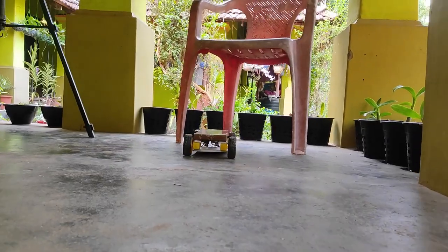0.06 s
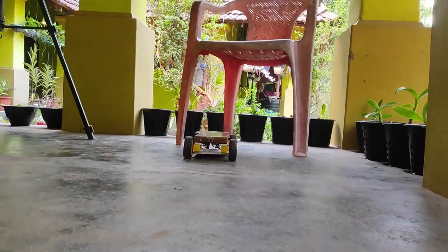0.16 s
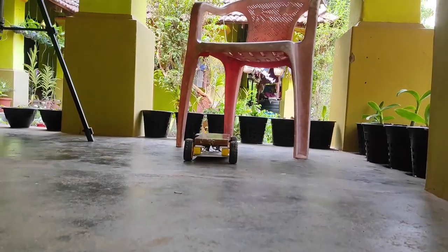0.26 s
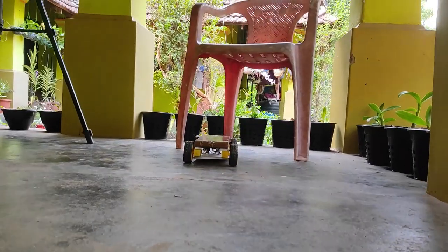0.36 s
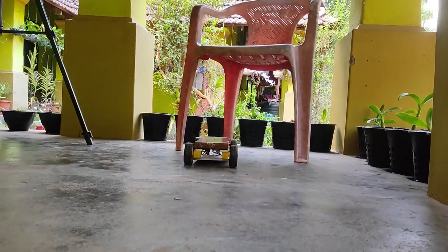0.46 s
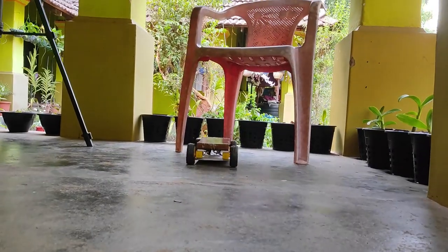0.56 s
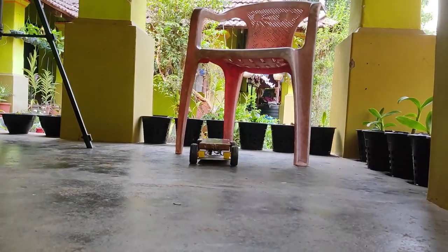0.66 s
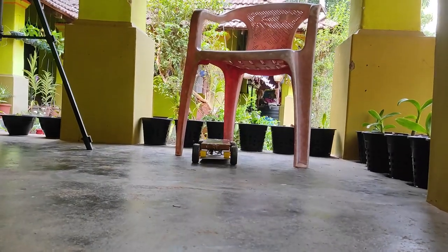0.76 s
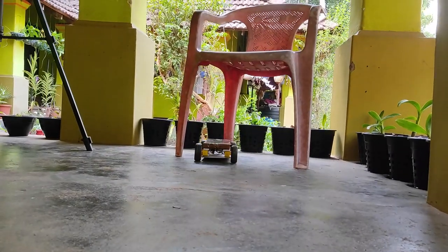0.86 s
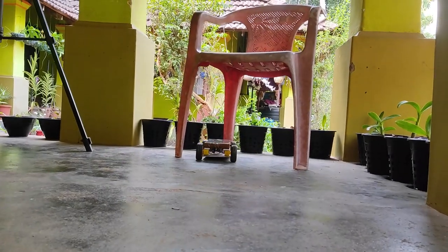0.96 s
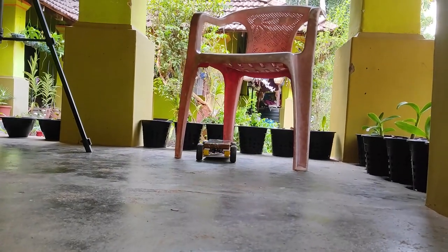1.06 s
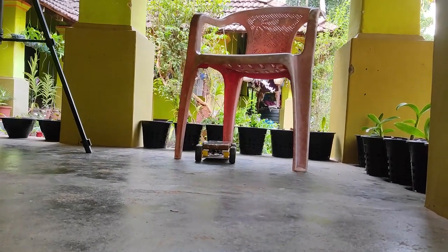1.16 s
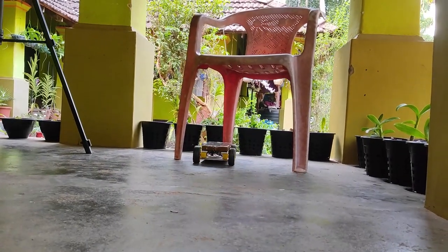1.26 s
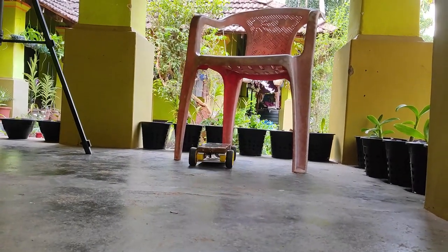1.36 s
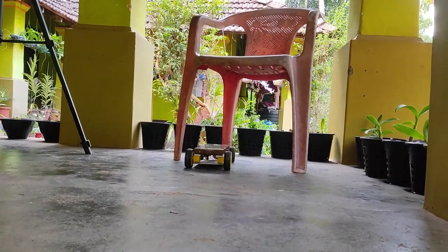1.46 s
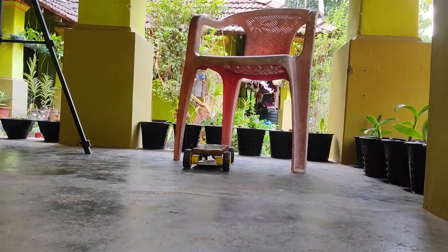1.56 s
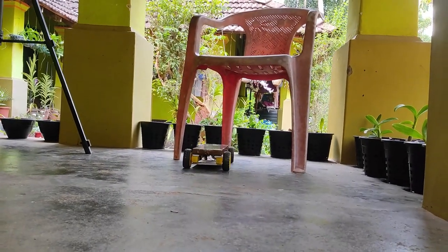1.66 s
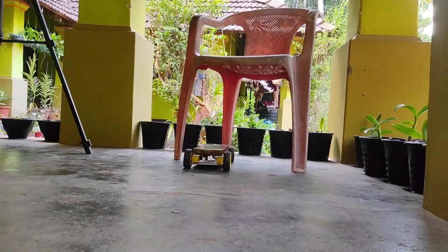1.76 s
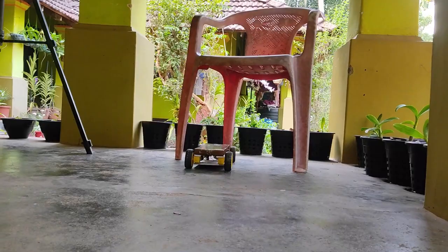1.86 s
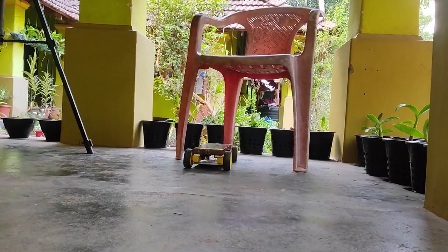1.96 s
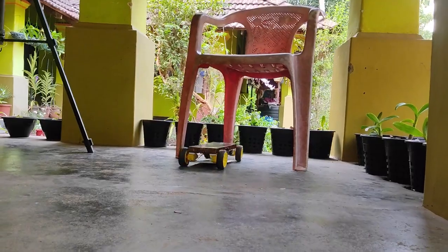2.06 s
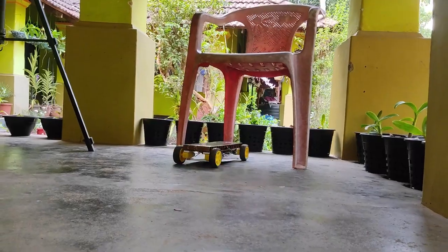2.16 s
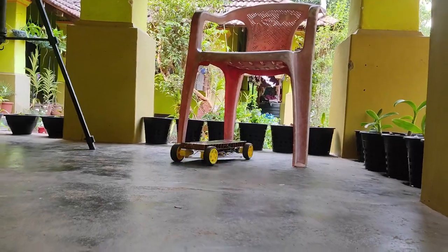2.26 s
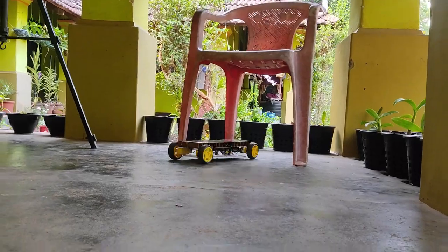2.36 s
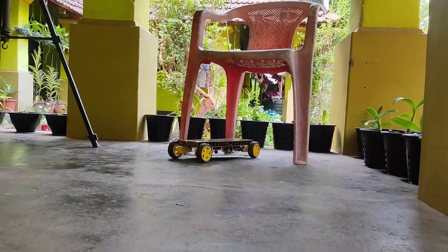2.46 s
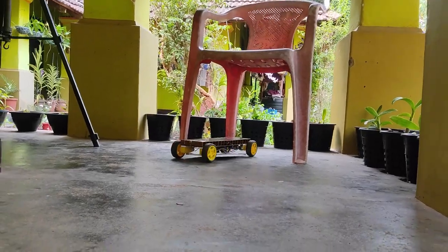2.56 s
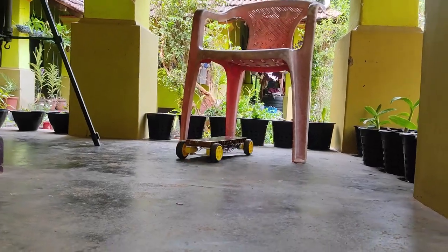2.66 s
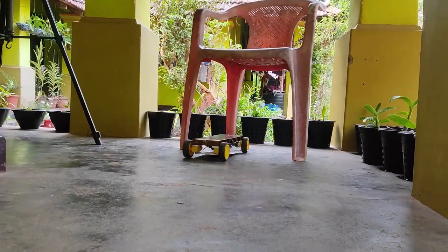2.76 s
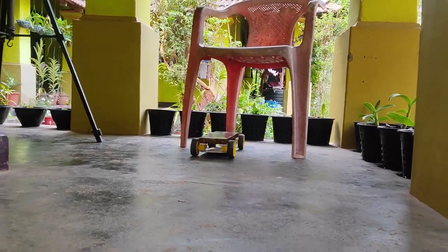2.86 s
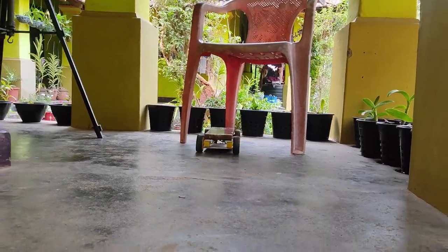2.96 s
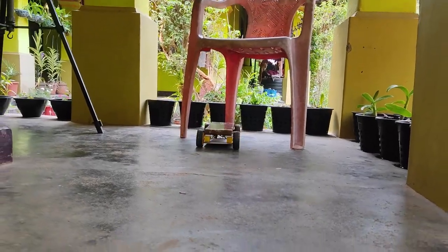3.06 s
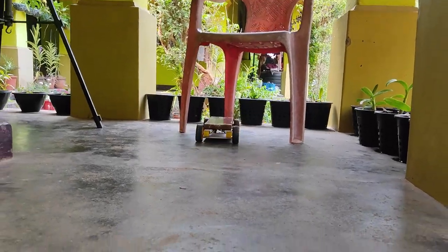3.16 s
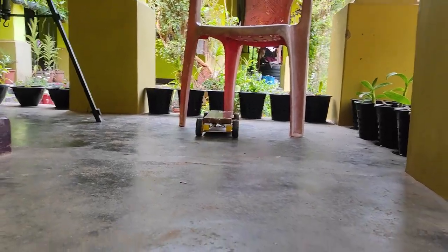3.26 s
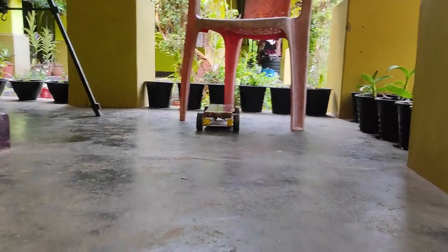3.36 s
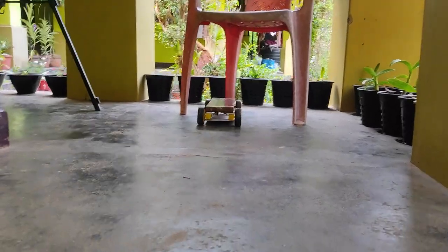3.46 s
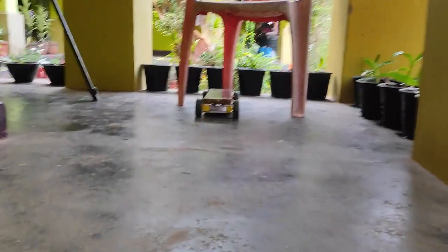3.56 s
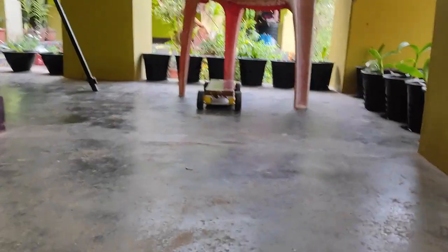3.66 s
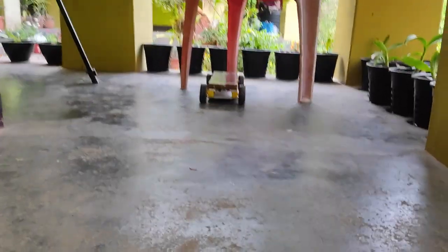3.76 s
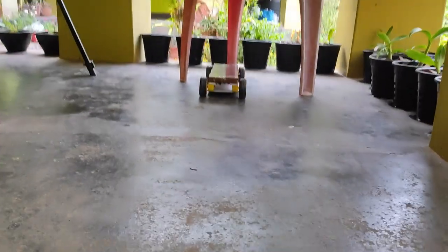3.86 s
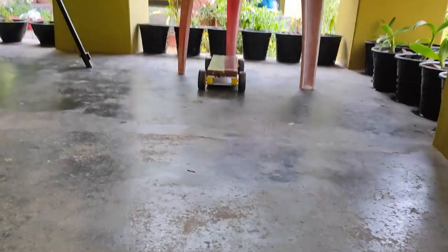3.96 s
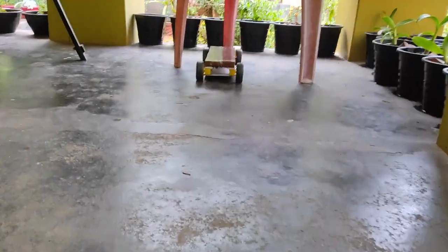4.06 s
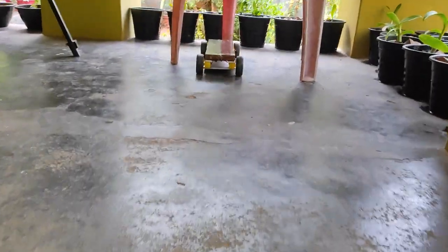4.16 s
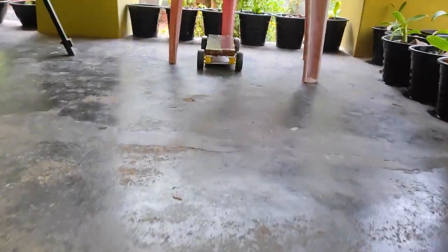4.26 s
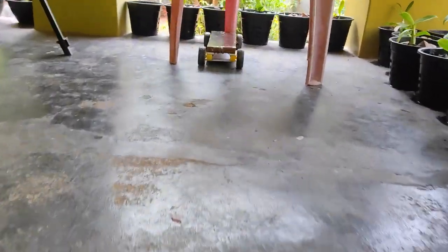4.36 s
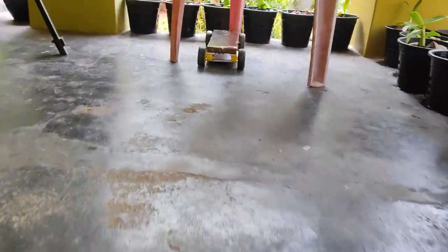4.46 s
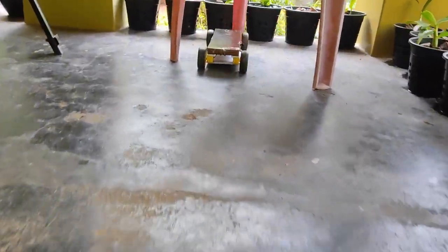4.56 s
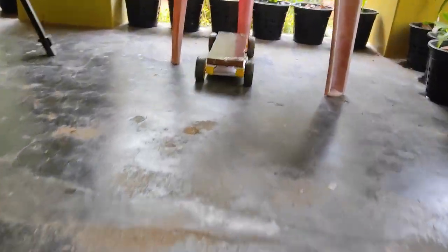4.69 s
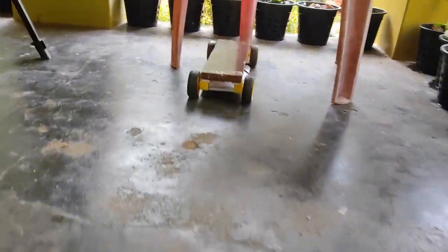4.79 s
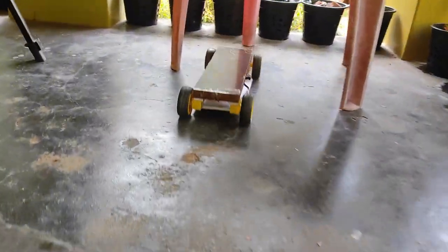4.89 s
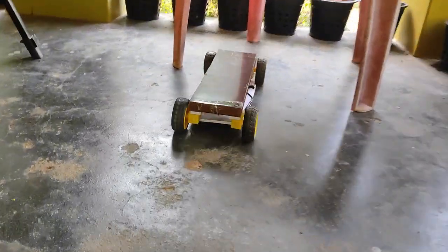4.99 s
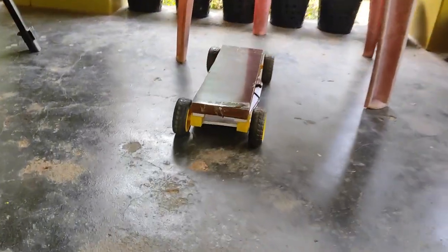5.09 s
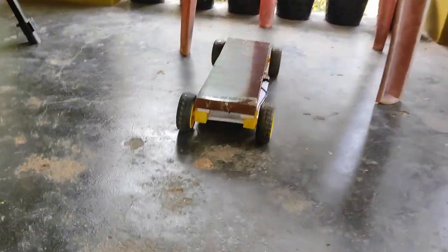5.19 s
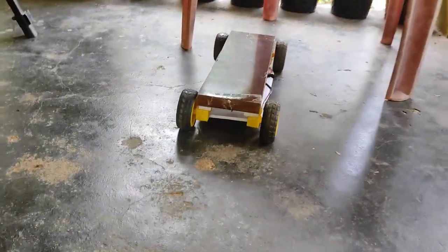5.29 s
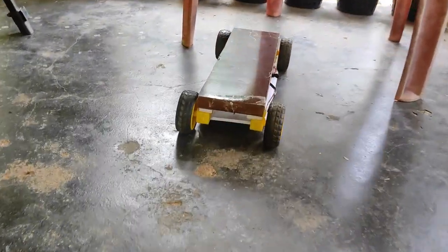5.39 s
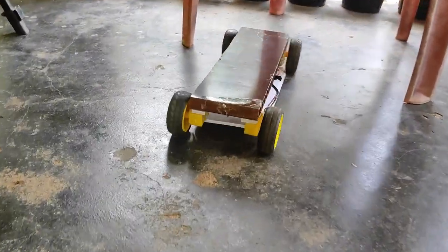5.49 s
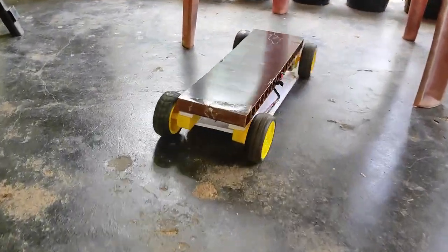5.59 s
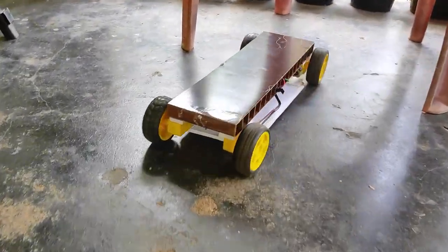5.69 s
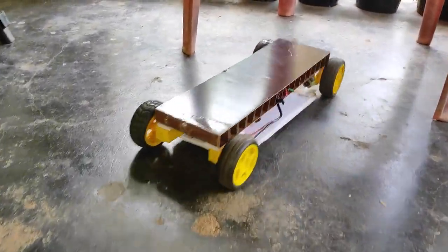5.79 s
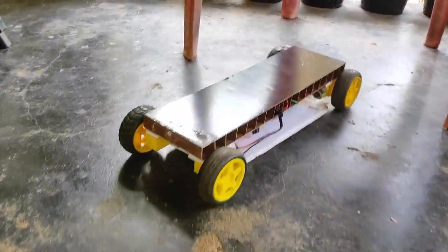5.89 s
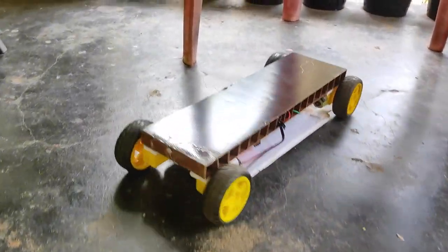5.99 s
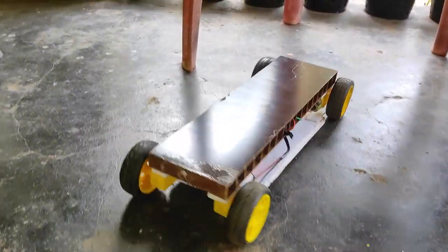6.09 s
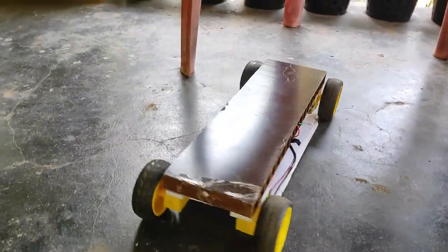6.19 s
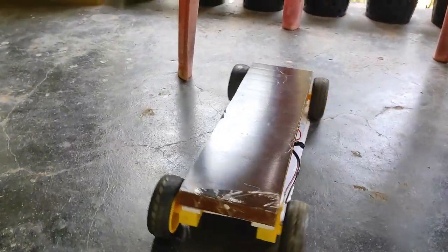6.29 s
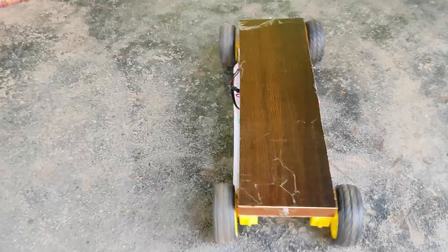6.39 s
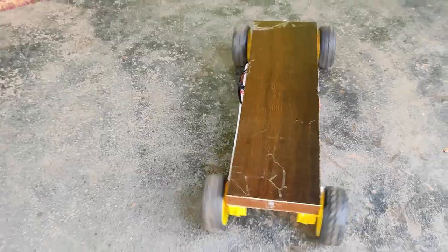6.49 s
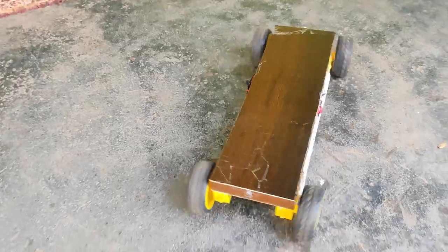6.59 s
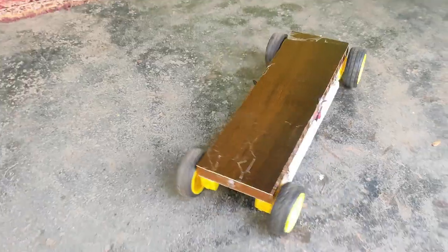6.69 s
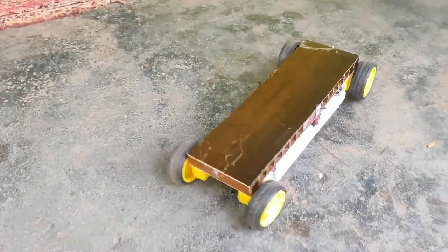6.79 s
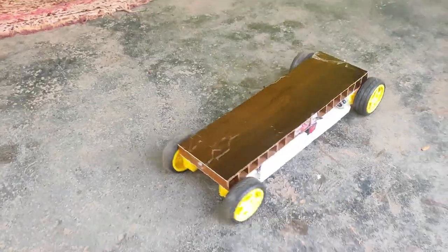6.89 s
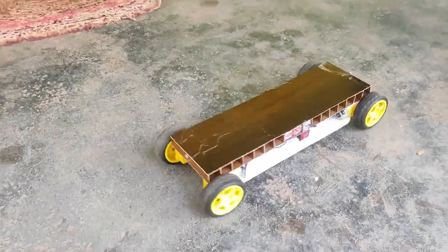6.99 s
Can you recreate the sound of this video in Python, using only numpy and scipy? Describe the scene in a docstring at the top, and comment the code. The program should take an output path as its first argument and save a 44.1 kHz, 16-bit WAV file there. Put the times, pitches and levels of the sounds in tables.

```python
"""A small robot car with four plastic gear motors drives back and forth in bursts on a concrete veranda.
Each gearbox whines at multiples of its tooth-mesh rate and rattles as the loose teeth knock; tyres rumble.
Soft rustles fall in the pauses, and a hand bumps the microphone, whose case rings in its modes.
After a short gap the car runs on rougher ground. Far birds, an insect and a low rumble and hum
sound faintly from the garden."""
import sys
import numpy as np
from scipy import signal
from scipy.fft import rfft, irfft
from scipy.io import wavfile

SR = 44100
rng = np.random.default_rng(int(sys.argv[2]) if len(sys.argv) > 2 else 0)


def log_audio(samples):
    """Write samples as a 16-bit WAV file to the path given in sys.argv[1]."""
    # one column per channel
    frames = np.atleast_2d(samples).T
    # limit to full scale, then quantise
    limited = np.clip(frames, -1, 1)
    pcm = np.round(limited * 32767).astype(np.int16)
    wavfile.write(sys.argv[1], SR, pcm)


N = 310464
TIME = np.arange(N) / SR
BINS = np.maximum(np.arange(N // 2 + 1) * SR / N, 1)

# noise spectra: f/Hz, relative spectral density/dB
GARDEN_SPECTRUM = [(12, -21), (20, 1), (55, -2), (75, -8.5), (140, -14.5), (211, -14.5), (522, -20),
                   (1160, -24), (1610, -28.5), (1790, -31), (2700, -31), (3760, -34), (5220, -40),
                   (7870, -38.5), (8550, -49.5), (14000, -43)]
VERANDA_HOUSING = [(100, -15), (300, -26), (700, -10), (1150, -7), (1480, 8), (1750, 1), (2200, -0.5),
                   (2900, 3.5), (3500, 3), (4300, 0), (5200, -2.5), (6500, -7), (7300, -9), (8500, -14)]   # radiated by gearboxes and chassis
ROUGH_HOUSING = [(100, -20), (400, -17.5), (900, -8), (1350, 5), (1520, -2), (1720, 15), (1920, 4.5),
                 (2150, -0.5), (3000, -1.5), (3900, 3.5), (4800, -5.5), (5800, -4.5), (6500, -3),
                 (7600, -17)]
FIZZ_SPECTRUM = [(5500, -7), (7800, 4), (9100, -3), (10200, 2), (12000, 2.5), (14400, -5)]
TYRE_SPECTRUM = [(60, -12), (130, -11), (200, 0), (280, -8), (450, 2), (650, -3.5), (900, 4.5), (1500, -28),
                 (4000, -50)]
RUSTLE_SPECTRUM = [(500, -10), (3500, 0), (7000, -2), (14000, -6)]
KNOCK_SPECTRUM = [(35, -26), (90, -9), (150, 0), (230, 2), (350, 1.5), (700, 3), (1100, -4.5), (2000, -5.5),
                  (3500, -14), (8000, -37)]
# likeness of the two sides: f/Hz, correlation
GARDEN_COHERENCE = [(30, 0.33), (200, 0.74), (600, 0.57), (1500, 0), (8000, 0.048)]
NEAR_COHERENCE = [(300, 1), (1400, 0.36), (2800, 0.44), (4500, 0.2), (8000, -0.33), (13000, 0.0026)]
# stereo image of the car: f/Hz, left minus right/dB
VERANDA_BALANCE = [(1000, 0), (1450, 0.5), (2200, -1.5), (3000, -4.5), (4300, -7.5), (5700, -2.5),
                   (7200, -10.5), (9000, -1), (11000, -7), (13500, -9)]
ROUGH_BALANCE = [(900, 1.5), (1330, -13.5), (1650, 1), (2000, -11.5), (3000, -3.5), (4000, -0.5),
                 (5000, -6), (6600, -14.5), (8000, 5), (13000, -1)]
# far bird notes: t/s, length/s, start f/Hz, end f/Hz, level/dB, rasp as a share of the pitch
BIRD_NOTES = [(0, .16, 1170, 1296, -63.5, 0.021), (.07, 0.27, 1295, 1360, -68, .015),
              (0, .16, 3450, 3700, -70, 0.044), (.22, 0.18, 780, 950, -65.5, 0.064),
              (.34, 0.13, 3150, 3140, -66, .03), (.41, 0.084, 2120, 2200, -66, 0.07),
              (3.42, 0.11, 3750, 3660, -63, 0.046), (3.42, 0.2, 2710, 2610, -68.5, 0.045),
              (3.442, .14, 1580, 1540, -69, 0.046), (3.3, .5, 828, 810, -69.5, 0.045),
              (5.34, 0.12, 3605, 3590, -61, 0.039), (5.345, 0.11, 2810, 2720, -64, 0.1)]
# the insect's tone: t/s, f/Hz, level/dB
INSECT_TONE = [(0, 8200, -98), (1.8, 7900, -82), (3.9, 7830, -67), (5.3, 7600, -66)]
# bursts of driving: power on t/s, up to speed t/s, power off t/s, 3rd harmonic/dB, 5th harmonic/dB,
# swell of the 3rd/(dB/s), scrub (how far unequal wheel loads part the motors' speeds),
# rattle/dB, fizz/dB, tyres/dB, run-down of rattle and fizz/(dB/s)
FORWARD_RUNS = [(.472, .605, .985, -35.5, -41.5, -16, .7, -40.3, -42, -68, 330),
                (1.972, 2.08, 2.485, -39.5, -46.5, 14, 1.7, -39.6, -44.6, -63.5, 450),
                (3.97, 4.115, 4.485, -35.8, -43.2, 1, .8, -41.5, -47.2, -65, 400),
                (5.468, 5.578, 5.97, -27.3, -47, 5, 1.6, -35.8, -42, -62, 450)]
REVERSE_RUNS = [(1.01, 1.066, 1.503, -41.8, -42, 5, 1.2, -42.8, -45.4, -64.5, 150),
                (2.5, 2.548, 2.985, -39.3, -40, -3, 1.2, -42.3, -47.6, -59.5, 230),
                (4.52, 4.571, 4.995, -38, -37.3, 0, 1.1, -40.8, -46.2, -63.5, 135),
                (5.965, 6.122, 6.43, -33.3, -34, -24, .9, -36, -41.3, -52, 200)]
ROUGH_RUN = (6.43, 6.66, 7.04, -33, -45, -4, .86, -38.2, -48, -68, 200)
DRAGGING_RUN = (5.47, 5.575, 5.97, -39.5, -55, -38, 1.2)   # one wheel drags in a turn; first seven columns only
# the mesh fundamental, one curve a run: t/s, f/Hz, level/dB
FORWARD_MESH = [
    [(.61, 1478, -36.5), (.8, 1489, -35), (.96, 1488, -50)],
    [(2.09, 1416, -43), (2.24, 1406, -40), (2.38, 1443, -50), (2.47, 1420, -46)],
    [(4.11, 1478, -42), (4.32, 1486, -41), (4.49, 1452, -44)],
    [(5.58, 1455, -46.5), (5.74, 1378, -49), (5.83, 1410, -51)],
]
REVERSE_MESH = [
    [(1.07, 1402, -28.5), (1.22, 1405, -31.5), (1.39, 1468, -26), (1.5, 1455, -28)],
    [(2.56, 1385, -37.5), (2.69, 1419, -35.5), (2.83, 1399, -29), (2.97, 1430, -28)],
    [(4.57, 1450, -28.5), (4.64, 1436, -28), (4.85, 1486, -27), (4.98, 1495, -27)],
    [(6.12, 1488, -25), (6.27, 1415, -27.3), (6.42, 1416, -26.5)],
]
ROUGH_MESH = [(6.5, 1327, -31), (6.76, 1327, -29.5), (6.92, 1355, -29), (7.04, 1334, -32.5)]
DRAGGING_MESH = [(5.57, 1252, -57), (5.76, 1190, -55)]
# further mesh harmonics: harmonic number, level against the 5th/dB
FORWARD_OVERTONES = [(2, 1), (4, -4.5), (6, -20.5), (7, -9.5), (8, -6)]
REVERSE_OVERTONES = [(2, -6), (4, -6.5), (6, -15), (7, -15.5), (8, -17), (9, -15)]
ROUGH_OVERTONES = [(2, -7), (4, -8.5)]
# the four motors: speed offset per unit of scrub/%, relative level/dB, lag of the right side/ms
MOTORS = [(0, 4.5, 0.095), (-1.14, -3, -0.042), (0.87, -6, 0.14), (-3, -10.5, 0.068)]
# dips of the whine: t/s, half width/s, depth/dB
LOAD_DIPS = [(2.33, .03, 15), (4.715, .028, 8), (6.603, .012, 6), (6.795, .02, 17)]
# faint rustles: peak t/s, level/dB, time to fall 60 dB/s
RUSTLES = [(1.695, -55.5, .25), (3.44, -66, .5), (3.59, -70, .2), (3.955, -60, .15)]
# bumps on the microphone's case: t/s, strength/dB
BUMPS = [(2.849, -41), (2.873, -43), (2.929, -46), (4.402, -20.5), (4.416, -29), (4.435, -39), (4.462, -23),
         (4.477, -22), (4.49, -17.5), (4.5, -31), (4.516, -25.5), (4.544, -28), (4.584, -29.5),
         (5.224, -51)]
# modes of that case: f/Hz, relative level/dB
CASE_MODES = [(207, -44.5), (298, -45), (355.3, -44), (473.7, -62), (651.4, -50.5), (705.2, -50.5),
              (920.5, -50), (985.1, -48), (1114, -66)]
# the silence between the two grounds: t/s, gain
GAP = [(0, 1), (6.421, 1), (6.428, 0), (6.467, 0), (6.474, 1), (7.04, 1)]
GAP_END_S = GAP[3][0]


def from_db(db):
    """Amplitude grows tenfold every 20 dB."""
    return 10 ** (np.asarray(db) / 20)


def rms_one(x):
    """Division by the RMS gives unit power."""
    return x / np.sqrt(np.mean(x ** 2) + 1e-20)


def in_time(rows, t=TIME):
    """Linear interpolation of each column in time."""
    times, *columns = np.transpose(rows)
    return [np.interp(t, times, column) for column in columns]


def at_hz(points, hz):
    """Interpolation on a log-frequency axis."""
    f, value = np.transpose(points)
    return np.interp(np.log(hz), np.log(f), value)


def drift(rate_hz, size=N):
    """Low-passed noise gives a random fluctuation of unit spread."""
    pole = np.exp(-40 * np.pi * rate_hz / SR)
    slow = signal.lfilter([1], [1, -2 * pole, pole * pole], rng.standard_normal(size // 20 + 2002))[2000:]
    return np.interp(np.arange(size) / 20, np.arange(len(slow)), rms_one(slow))


def stereo_noise(spectrum, coherence, band_hz, balance=((1000, 0),), drive=1):
    """Source and filter: driven noise is shaped and spread; its middle has unit power in the band."""
    mid, side = rfft(rng.standard_normal((2, N)) * drive)
    alike = np.clip(at_hz(coherence, BINS), -.95, .99)
    sides = np.array([[1], [-1]])
    pair = mid + np.sqrt((1 - alike) / (1 + alike)) * side * sides
    pair *= from_db(at_hz(spectrum, BINS) + sides * at_hz(balance, BINS) / 2)
    inside = (BINS > band_hz[0]) & (BINS < band_hz[1])
    return irfft(pair, N) / np.std(irfft(pair.mean(axis=0) * inside, N))


def garden_air(rumble_db=-57.8, hum_db=-62, hum_hz=49.2, drop_db=7, recovery_s=.7):
    """Ambient noise: a broadband rumble and a wavering hum, which recover slowly after the gap."""
    rumble = from_db(rumble_db) * stereo_noise(GARDEN_SPECTRUM, GARDEN_COHERENCE, (20, 14000))
    hum = from_db(hum_db + 3 * drift(1.4)) * np.sqrt(2) * np.sin(2 * np.pi * hum_hz * TIME + drift(4))
    since_gap = TIME - GAP_END_S
    return (rumble + hum) * from_db(-drop_db * (since_gap > 0) * np.exp(-abs(since_gap) / recovery_s))


def birds():
    """Random frequency modulation makes each far, gliding note rasp."""
    out = np.zeros(N)
    for start, length, start_hz, end_hz, db, rasp in BIRD_NOTES:
        on = (TIME > start) & (TIME < start + length)
        progress = (TIME[on] - start) / length
        hz = (start_hz + (end_hz - start_hz) * progress) * (1 + rasp * drift(304, len(progress)))
        envelope = from_db(db) * np.sqrt(2 * np.sin(np.pi * progress))
        out[on] += envelope * np.sin(2 * np.pi * np.cumsum(hz) / SR)
    return out


def insect(spread=.022, chirp_hz=19, chirp_db=4):
    """Amplitude modulation makes a thin, unsteady tone chirp."""
    hz, db = in_time(INSECT_TONE)
    envelope = from_db(db + chirp_db * np.sin(2 * np.pi * chirp_hz * TIME + drift(8.7)))
    unsteady_hz = hz * (1 + spread * np.array([drift(299.1), drift(299.1)]))
    return envelope * np.sin(2 * np.pi * np.cumsum(unsteady_hz, axis=1) / SR)


def spin_up(run, t=TIME):
    """A linear ramp from zero at power on to one at full speed."""
    on, at_speed = run[:2]
    return np.clip((t - on) / max(at_speed - on, .005), 0, 1)


def coasting(run, t=TIME):
    """Seconds of running on by inertia since the power went off."""
    return np.maximum(t - run[2], 0)


def swell_db(run, t=TIME):
    """Exponential growth or decay: a straight line in dB about the middle of a run."""
    on, at_speed, off = run[:3]
    return run[5] * (np.clip(t, on, off) - (at_speed + off) / 2)


def load_dip_db(t=TIME):
    """The level falls in Gaussian dips as the load comes off the teeth."""
    return -sum(depth * np.exp(-np.minimum(((t - s) / width) ** 2, 20)) for s, width, depth in LOAD_DIPS)


def tyre_judder(scrub, t, grip=1.2, depth_percent=2.4, rate_hz=38):
    """Frequency modulation in %: scrubbed past their grip, the tyres judder and warble the motors."""
    return depth_percent * max(scrub - grip, 0) * np.sin(2 * np.pi * rate_hz * t + drift(10, len(t)))


def gear_whine(run, mesh, overtones, balance, bite, release_s, wander, jitter_percent, flutter_db,
               eccentric, lead_db, slap, coast_hz_per_s=3400):
    """Periodic tooth contact gives each gearbox a harmonic series; their unequal speeds beat."""
    on, _, off, third_db, fifth_db, _, scrub = run[:7]
    span = (TIME > on) & (TIME < off + .12)
    t, out = TIME[span], np.zeros((2, N))
    mesh_hz, tone_db = in_time(mesh, t)
    mesh_hz = mesh_hz - coast_hz_per_s * coasting(run, t)
    onset = spin_up(run, t) ** bite   # more bite: later and more sudden
    envelope = onset * np.exp(-(coasting(run, t) / release_s) ** 2) * from_db(load_dip_db(t))
    harmonics = [(1, tone_db), (3, third_db + swell_db(run, t)), (5, fifth_db)]
    harmonics += [(round(k), fifth_db + db) for k, db in overtones]
    share = from_db([db for _, db, _ in MOTORS])
    deck = share * from_db([lead_db, 0, 0, 0])   # one motor drives the deck's resonance hardest
    share, deck = share / np.linalg.norm(share), deck / np.linalg.norm(deck)
    judder = tyre_judder(scrub, t)
    for m, (offset, _, lag_ms) in enumerate(MOTORS):
        load = scrub * (offset + wander * drift(13.94, len(t)))
        backlash = jitter_percent * drift(111, len(t))   # play between the teeth
        phase = 2 * np.pi * np.cumsum(mesh_hz * (1 + (judder + load + backlash) / 100)) / SR
        pinion = phase / 8 + rng.uniform(0, 2 * np.pi)   # eight teeth, slightly off centre
        for k, db in harmonics:
            throb = 1 + eccentric * np.cos(pinion + rng.uniform(0, 2 * np.pi))
            flutter = rms_one(throb * from_db(flutter_db * drift(49, len(t))))
            amplitude = np.sqrt(2) * (deck if k == 1 else share)[m] * from_db(db) * flutter * envelope
            smear = slap * np.log(k) * drift(76, len(t))   # uneven tooth landings blur upper harmonics
            hz = k * np.median(mesh_hz)
            skew_rad = np.clip(2 * np.pi * hz * lag_ms / 1000, -1.5, 1.5)
            sides = from_db(np.array([.5, -.5]) * at_hz(balance, hz)) * np.exp([0, -1j * skew_rad])
            sides /= abs(sides.mean())
            out[:, span] += amplitude * np.real(sides[:, None] * np.exp(1j * (k * phase + smear)))
    return out


def gear_rattle(runs, mesh_hz, body, balance, rise, uneven_db, flutter_db=.9):
    """Impact excitation: loose teeth knock once per mesh, unevenly, and shake the plastic housings."""
    teeth = np.cumsum(mesh_hz) / SR
    strength = from_db(uneven_db * rng.standard_normal(N))[teeth.astype(int)]
    knocks = strength * np.exp(-1.6 * (teeth % 1)) * from_db(flutter_db * drift(35))
    housing_gain = fizz_gain = 0
    for run in runs:
        rattle_db, fizz_db, _, down_db_per_s = run[7:]
        run_down = from_db(-down_db_per_s * np.minimum(coasting(run), 1))
        housing_gain += spin_up(run) ** rise * run_down * from_db(rattle_db)
        # the fizz sets in later and follows part of the swell
        fizz_gain += spin_up(run) ** 1.15 * run_down * from_db(fizz_db + .3 * swell_db(run))
    housing = stereo_noise(body + [(12000, -35)], NEAR_COHERENCE, (2000, 3700), balance, knocks)
    fizz = stereo_noise(FIZZ_SPECTRUM, NEAR_COHERENCE, (7800, 14000), balance, knocks)
    return (housing_gain * housing + fizz_gain * fizz) * from_db(.27 * load_dip_db())


def veranda(x, t60=.23, wet_db=-10.5):
    """Reverberation: floor, pillars and roof return a short diffuse tail, different on each side."""
    t = TIME[:SR // 2]
    tail = rng.standard_normal((2, len(t))) * from_db(-60 * t / t60) * (t > .004)
    tail /= np.linalg.norm(tail, axis=1, keepdims=True)
    return x + from_db(wet_db) * signal.fftconvolve(x, tail, axes=1)[:, :N]


def car_on_veranda():
    """Harmonic balance sets timbre: upper harmonics lead going forward, the fundamental in reverse."""
    forward = sum(gear_whine(run, mesh, FORWARD_OVERTONES, VERANDA_BALANCE, bite=5, release_s=.015,
                             wander=.556, jitter_percent=.903, flutter_db=1.5, eccentric=.14,
                             lead_db=2.5, slap=.18) for run, mesh in zip(FORWARD_RUNS, FORWARD_MESH))
    reverse = sum(gear_whine(run, mesh, REVERSE_OVERTONES, VERANDA_BALANCE, bite=12, release_s=.027,
                             wander=.302, jitter_percent=.713, flutter_db=1.7, eccentric=.085,
                             lead_db=9, slap=.7) for run, mesh in zip(REVERSE_RUNS, REVERSE_MESH))
    dragging = gear_whine(DRAGGING_RUN, DRAGGING_MESH, [], VERANDA_BALANCE, bite=12, release_s=.02,
                          wander=.829, jitter_percent=1.395, flutter_db=6.5, eccentric=.3,
                          lead_db=3, slap=.47)
    mesh_curve = sorted(tuple(row) for mesh in FORWARD_MESH + REVERSE_MESH for row in mesh)
    rattle = gear_rattle(FORWARD_RUNS + REVERSE_RUNS, in_time(mesh_curve)[0], VERANDA_HOUSING,
                         VERANDA_BALANCE, rise=1.1, uneven_db=1.3)
    return veranda(forward + reverse + dragging + rattle)


def tyres(runs, grit_db=.5, down_db_per_s=90):
    """Rolling noise: the treads rumble over the grain of the floor and roll on a little after a run."""
    rolling = sum(spin_up(run) * from_db(run[9] - down_db_per_s * coasting(run)) for run in runs)
    return rolling * from_db(grit_db * drift(33)) * stereo_noise(TYRE_SPECTRUM, NEAR_COHERENCE, (60, 1500))


def rustles(rise_s=.03):
    """Noise transients: soft hisses rise linearly and decay exponentially."""
    envelope = np.zeros(N)
    for peak_s, db, t60 in RUSTLES:
        age = TIME - peak_s
        envelope += np.clip(age / rise_s + 1, 0, 1) * from_db(db - 60 * np.maximum(age, 0) / t60)
    return envelope * stereo_noise(RUSTLE_SPECTRUM, NEAR_COHERENCE, (500, 14000))


def case_bumps(ring_db=28, ring_t60=.34, knock_db=-8, knock_t60=.022, rub_db=-15.5, rub_t60=.28):
    """Damped free vibration: a knock and a short rub set the case ringing, its low modes longest."""
    ring, scuff = np.zeros((2, N))
    t = TIME[:SR // 2]
    for start, db in BUMPS:
        at = slice(round(start * SR), round(start * SR) + len(t))
        scuff[at] += from_db(db + knock_db - 60 * t / knock_t60) + from_db(db + rub_db - 60 * t / rub_t60)
        for hz, mode_db in CASE_MODES:
            mode_t60 = ring_t60 * np.sqrt(350 / hz)
            envelope = from_db(db + ring_db + mode_db - 60 * t / mode_t60)
            ring[at] += rng.choice([-1, 1]) * envelope * np.sin(2 * np.pi * hz * t)
    return ring + scuff * stereo_noise(KNOCK_SPECTRUM, [(500, .9), (3000, .41)], (80, 1100))


def car_on_rough_ground():
    """Mechanical loading: on coarse concrete the motors run slower and shake more."""
    whine = gear_whine(ROUGH_RUN, ROUGH_MESH, ROUGH_OVERTONES, ROUGH_BALANCE, bite=1.2, release_s=.04,
                       wander=.402, jitter_percent=.854, flutter_db=1.5, eccentric=.1, lead_db=4, slap=.21)
    mesh_hz = in_time(ROUGH_MESH)[0]
    return whine + gear_rattle([ROUGH_RUN], mesh_hz, ROUGH_HOUSING, ROUGH_BALANCE, rise=.95, uneven_db=1.1)


def scene():
    """Superposition: the veranda until the gap, then the rough ground, with the garden behind both."""
    on_veranda = car_on_veranda() + tyres(FORWARD_RUNS + REVERSE_RUNS) + case_bumps() + rustles()
    on_rough_ground = car_on_rough_ground() + tyres([ROUGH_RUN])
    garden = garden_air() + np.array([birds(), birds()]) + insect()
    return on_veranda * (TIME < GAP_END_S) + on_rough_ground + garden


def record(dry, cutoff_hz=14250):
    """Gating and low-pass filtering: the sound drops out for a moment and the top treble is cut."""
    low_pass = signal.ellip(10, .2, 80, cutoff_hz, fs=SR, output="sos")
    return signal.sosfilt(low_pass, dry * in_time(GAP)[0])


dry = scene()
out = record(dry)
log_audio(out)
```